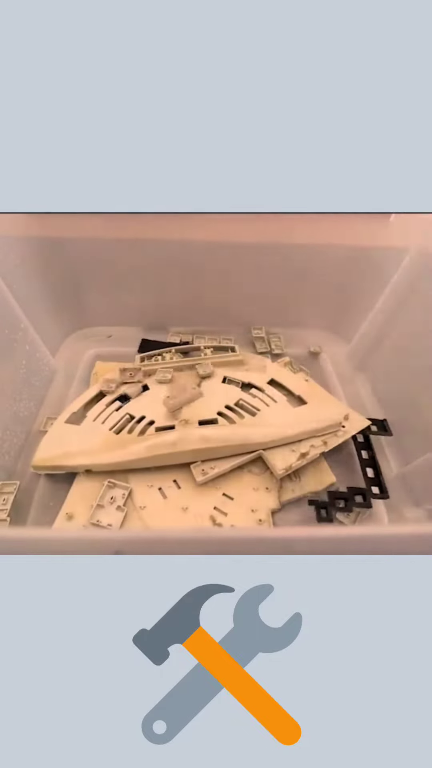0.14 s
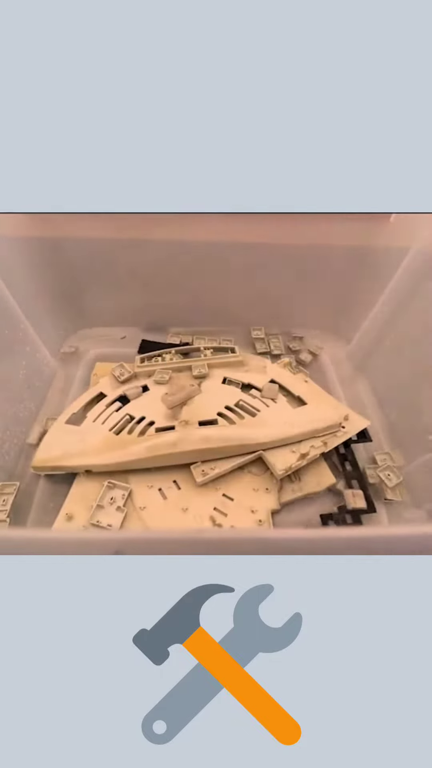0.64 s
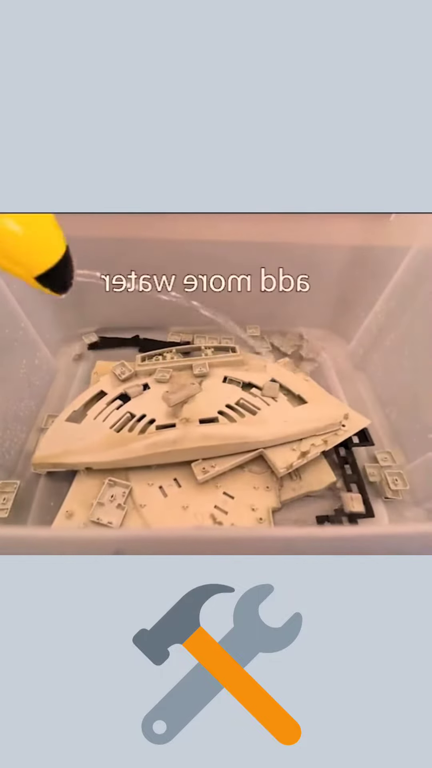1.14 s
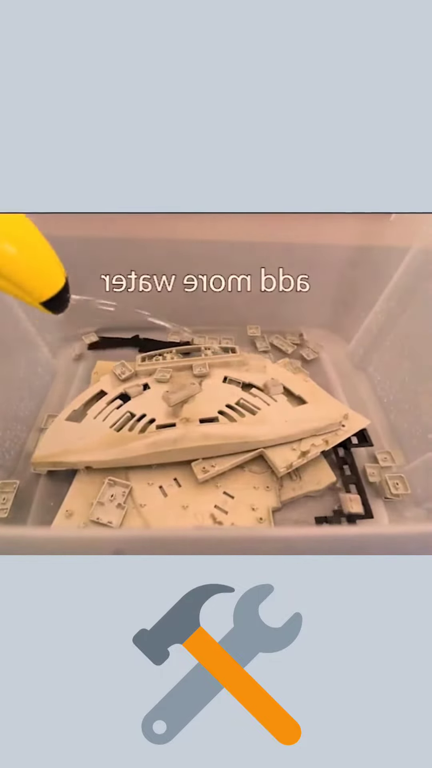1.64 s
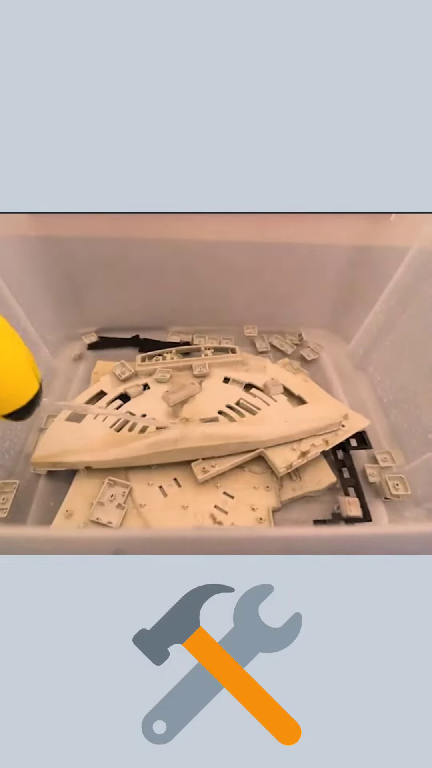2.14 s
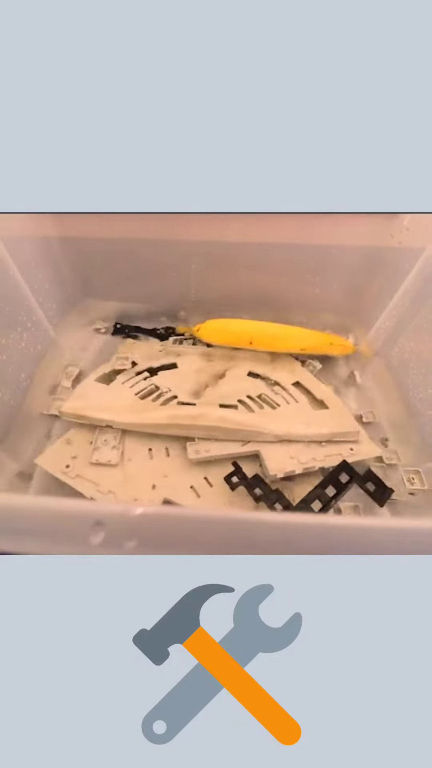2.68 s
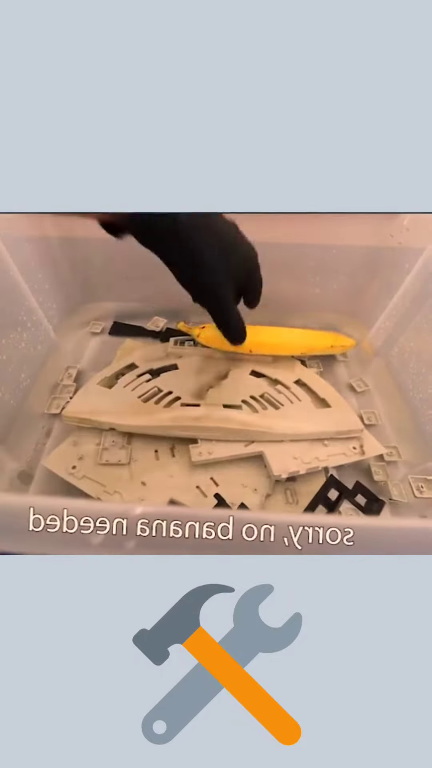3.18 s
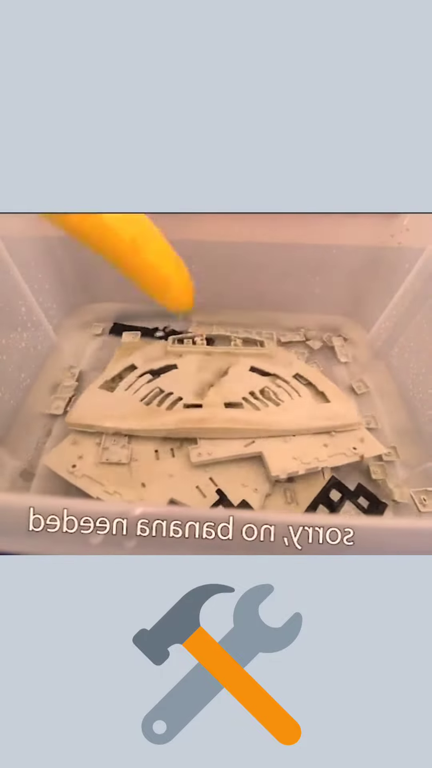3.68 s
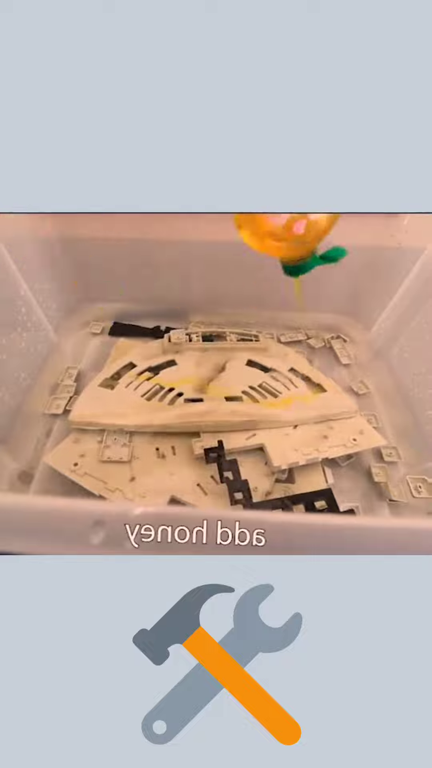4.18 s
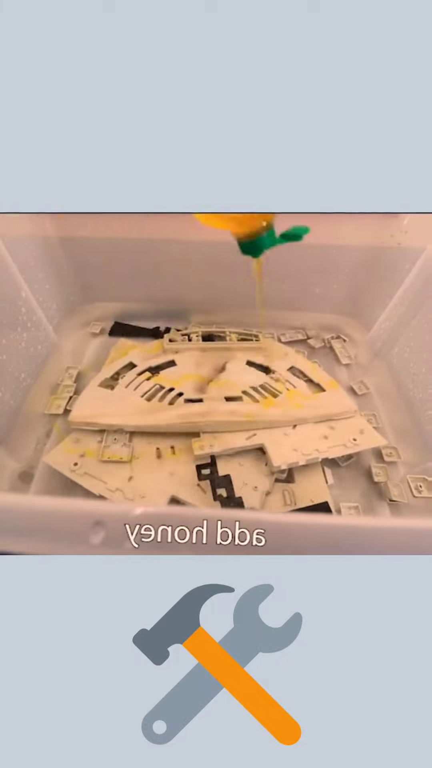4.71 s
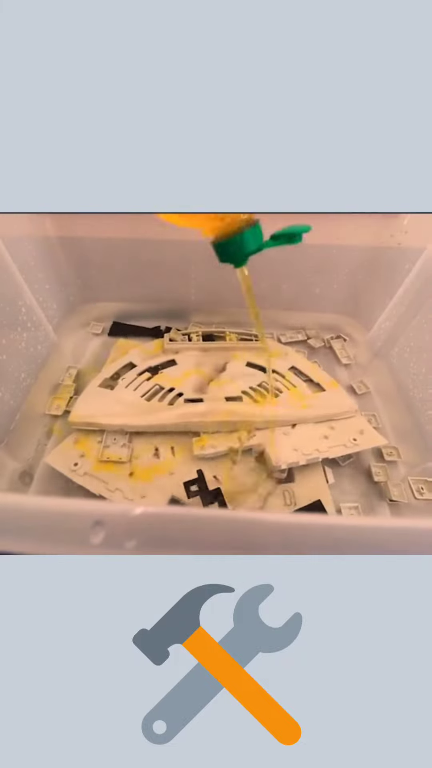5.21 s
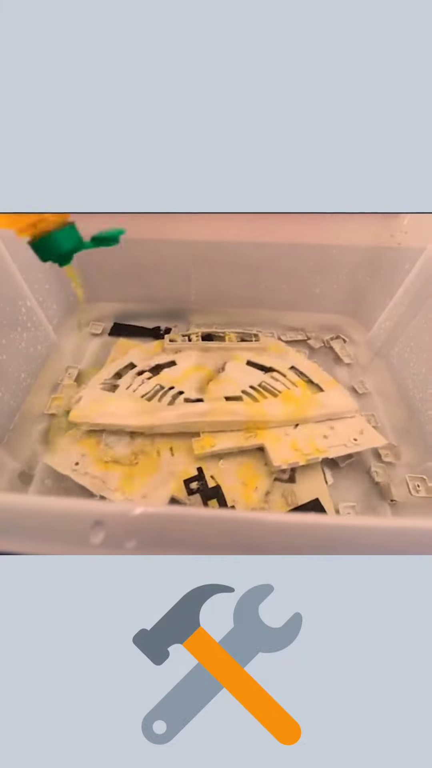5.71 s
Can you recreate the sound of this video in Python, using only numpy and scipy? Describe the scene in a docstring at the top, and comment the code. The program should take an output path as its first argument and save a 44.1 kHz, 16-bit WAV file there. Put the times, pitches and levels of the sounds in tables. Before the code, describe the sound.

Small hard plastic pieces rattle and click in a plastic tub, heard close in stereo in a small quiet room. A busy first second of clatter with hollow knocks and a short creak gives way to sparse taps. Something heavier lands at about two and a half seconds with a loud clatter, settling quickly. Afterwards only faint ticks, a single knock, a brief bottle rasp and thin high fizzing over soft hiss.

```python
"""Keycaps stirred in a plastic tub

Loose plastic keycaps and parts are dropped, stirred and knocked about in a plastic tub on a workbench.
Single caps click (shaped noise through resonances); heavier parts thump the tub (damped modes).
Crowds of tiny contacts rattle and hiss (noise broken into hits); a part creaks, a bottle rasps (noise puffs).
Close stereo in a quiet small room with hiss and a faint hum; the loudest peaks round off."""
import sys
import numpy as np
from scipy import signal
from scipy.fft import rfft, irfft, next_fast_len
from scipy.io import wavfile
from scipy.ndimage import uniform_filter1d

SR = 44100
rng = np.random.default_rng(int(sys.argv[2]) if len(sys.argv) > 2 else 0)


def invert_db(x):
    """Field ratio 10**(x/20) for x, a level in decibels (scalar or array-like)."""
    u = np.asarray(x, float) / 20
    return 10 ** u


def output_pcm(signal):
    """Save a mono or channel-first signal as 16-bit PCM at the path in sys.argv[1].

    Samples are clipped to [-1, 1] before scaling.
    """
    pcm = np.clip(np.atleast_2d(signal).T, -1, 1) * 32767
    wavfile.write(sys.argv[1], SR, np.round(pcm).astype(np.int16))


N = 257544


def unit(x):
    """Scaled to rms 1."""
    return x / np.sqrt(np.mean(x ** 2) + 1e-20)


def along(points, hz):
    """Interpolates (frequency, value) points on a log frequency axis."""
    point_hz, value = np.transpose(points)
    return np.interp(np.log(hz + 1), np.log(point_hz + 1), value)


def filtered(x, response):
    """x times a complex response of frequency."""
    m = next_fast_len(N + SR // 2)
    return irfft(rfft(x, m) * response(np.fft.rfftfreq(m, 1 / SR)), m)[..., :N]


def colour(spectrum):
    """Gain curve through (frequency [Hz], level [dB]) points."""
    return lambda hz: invert_db(along(spectrum, hz))


def peak(hz, centre_hz, width_hz):
    """Response of a causal resonance, 1 at its centre."""
    return 1j * hz * width_hz / (centre_hz ** 2 - hz ** 2 + 1j * hz * width_hz)


# cavities of the caps: (centre [Hz], width [Hz], level [dB])
CAP_CAVITIES = [(1600, 320, -3), (2840, 78, -4.5), (3650, 340, -9.5), (5704, 400, -11.5)]


def hollow(hz):
    """The hollow caps lift a few bands over a flat response."""
    return 0.95 + sum(invert_db(db) * peak(hz, centre_hz, width_hz) for centre_hz, width_hz, db in CAP_CAVITIES)


# stereo likeness of the tub: (frequency [Hz], left-right correlation [1])
TUB_ALIKE = [(50, .4), (130, .975), (700, .98), (1400, .78), (5000, .57), (14000, .3)]


def spread(pair, alike):
    """Two signals mixed as mid and side into left and right of a given likeness."""
    def mix(hz):
        turn = np.arccos(np.clip(along(alike, hz), -1, 1)) / 2
        return np.array([np.cos(turn), 1j * np.sin(turn)])

    mid, side = filtered(pair, mix)
    return np.array([mid + side, mid - side])


def ring(modes, t, scatter_db):
    """Damped modes at new strengths, slightly detuned."""
    out = np.zeros(len(t))
    for hz, db, t60_s in modes:
        strength, detune = rng.standard_normal(2)
        decay = invert_db(db + scatter_db * strength - 60 * t / t60_s)
        out += decay * np.sin(2 * np.pi * hz * (1 + .012 * detune) * t)
    return out


def crowd(per_second, t60_s, size_db):
    """Tiny contacts of scattered size, the big ones with a sharp tick, gate two independent noises."""
    size = invert_db(size_db * np.minimum(rng.exponential(size=N), np.pi))
    hits = (rng.random(N) < per_second / SR) * size
    t = np.arange(SR // 20) / SR
    power = signal.fftconvolve(hits ** 2, invert_db(-120 * t / t60_s))[:N]
    return (np.sqrt(np.abs(power)) + 0.38 * hits ** 2) * rng.standard_normal((2, N))


def patchy(x, depth_db):
    """x with patches of random gain over time and frequency."""
    z = signal.stft(x, nperseg=256)[2]
    field = uniform_filter1d(rng.standard_normal(z.shape[1:]), size=12, axis=0)
    field = uniform_filter1d(field, size=10, axis=1)
    return unit(signal.istft(z * invert_db(depth_db * unit(field)), nperseg=256)[1][:, :N])


# room and microphone hiss: (frequency [Hz], relative density [dB per Hz])
HISS = [(35, -55), (90, -27.5), (176, -6), (202, -11.5), (1090, -21.5), (1620, -20.5), (4640, -25),
        (16000, -32.5)]
# hiss likeness: (frequency [Hz], left-right correlation [1])
HISS_ALIKE = [(130, 1), (640, 0.64), (1400, 0.78), (7000, .05)]
# hum: (frequency [Hz], level [dB rms])
HUM_TONES = [(172, -68.5)]


def air():
    """Steady coloured noise as hiss; noise in a very narrow resonance as a faint wavering hum."""
    hiss_db_rms = -58
    hiss = unit(spread(filtered(rng.standard_normal((2, N)), colour(HISS)), HISS_ALIKE))
    out = invert_db(hiss_db_rms) * hiss
    for hz, db in HUM_TONES:
        out += invert_db(db) * unit(filtered(rng.standard_normal(N), lambda f: peak(f, hz, 2.5)))
    return out


# sliding, spilling, settling parts:
# (start [s], length [s], rattle level [dB], fizz re rattle [dB], tub wall re rattle [dB])
SWARM_EVENTS = [(0.001, 0.018, -40.5, -1, 3), (0.037, 0.036, -39, 5.5, -13), (0.074, 0.18, -15.5, 0.5, -21),
                (0.293, 0.011, -37.5, 7, -28), (0.342, 0.18, -27, -2.5, -11),
                (0.558, 0.053, -36.5, -3, 0.5), (0.636, 0.084, -26.5, -3, -17),
                (0.749, 0.06, -26, -13, -3.5), (0.867, 0.075, -35.5, -4.5, -28),
                (0.97, 0.023, -28.5, 6.5, -15), (0.997, 0.072, -24, -4.5, -7),
                (1.076, 0.05, -20.5, -4, -11), (1.125, 0.046, -36.5, 7, -7.5), (1.179, 0.11, -39, -2.5, -8),
                (1.304, 0.06, -38.5, 0.5, -16.5), (1.359, 0.28, -45.0, -3.5, -4),
                (1.547, 0.18, -41.5, -5, -12.5), (1.615, 0.051, -28, -0.5, -19),
                (1.682, 0.2, -43.5, 3.5, -3), (1.888, 0.038, -39.5, -6, -4.5),
                (1.922, 0.062, -25.5, -6, -17), (1.991, 0.059, -38.5, -1, -8),
                (2.053, 0.24, -46.5, -4, -7.5), (2.361, 0.033, -34, -6.5, -14.5),
                (2.437, 0.0089, -37, -12, 12.5), (2.453, 0.03, -12.5, -9, -2),
                (2.488, 0.09, -22.5, -10, -2.5), (2.582, 0.14, -34, -12, 1.5), (2.734, 0.13, -45, -15.5, 6),
                (2.87, 0.22, -53, -22, 3), (3.211, 0.14, -53.5, -5, -9.5), (3.363, 0.31, -48, -4.5, 8.5),
                (3.688, 0.082, -50, -10.5, 1), (3.788, 0.044, -58, -23.5, 17.5),
                (3.851, 0.023, -51, -17, 11.5), (3.969, 0.049, -41, -16, -2), (4.479, 0.088, -68.5, 19, 1),
                (4.835, 0.021, -56, 21.5, -11), (4.987, 0.055, -70.5, 16, 3.5),
                (5.058, 0.09, -70.5, 21.5, 4.5), (5.263, 0.052, -57.5, 18.5, 4),
                (5.386, 0.038, -66.5, 18.5, 5), (5.469, 0.096, -59, 10.5, -1), (5.564, 0.33, -59.5, 0, 5)]
# start-to-end loss of a swarm set off by a click: (rattle [dB], fizz [dB], wall [dB])
SWARM_SAG = [8.5, 8.5, 19.5]
# steady faint noise floor under the swarms: (rattle [dB], fizz [dB], wall [dB])
NOISE_FLOOR = [-68, -68, -67]


def swarms():
    """Levels [dB] of rattle, fizz, wall: swarms rise and fade, click-set ones sag; powers add."""
    swell_db_per_s, burst_db_per_s, fade_db_per_s = 2006.5, 5000.5, 1148
    set_off_s = .006  # a click this close to the start sets the swarm off; otherwise a push swells
    t = np.arange(N) / SR
    power = invert_db(np.c_[NOISE_FLOOR]) ** 2 * np.ones(N)
    for start_s, length_s, db, fizz_db, wall_db in SWARM_EVENTS:
        set_off = min(abs(start_s - click[0]) for click in CLICK_EVENTS) < set_off_s
        rise_db = (burst_db_per_s if set_off else swell_db_per_s) * np.maximum(start_s - t, 0)
        edge_db = db - rise_db - fade_db_per_s * np.maximum(t - start_s - length_s, 0)
        near = edge_db > -100
        through = np.clip((t[near] - start_s) / length_s, 0, 1) - .5
        sag_db = set_off * np.outer(SWARM_SAG, through)
        power[:, near] += invert_db(edge_db[near] + np.c_[[0, fizz_db, wall_db]] - sag_db) ** 2
    return 10 * np.log10(power)


# rattle colour: (frequency [Hz], relative density [dB per Hz])
RATTLE_COLOUR = [(800, -28), (1300, -6.5), (3400, -0.5), (6500, -6.5), (7500, -40)]
# fizz and click-snap colour: (frequency [Hz], relative density [dB per Hz])
FIZZ_COLOUR = [(5000, -30.5), (7400, -3), (9000, -4), (15500, -8), (16400, -31.5)]


def stir():
    """Swarms of small contacts: a rattle in the caps, a fizz above it, a mutter in the wall, a low rumble."""
    rattle_db, fizz_db, wall_db = swarms()
    rattle = filtered(crowd(450, 0.047, size_db=3.5), lambda f: colour(RATTLE_COLOUR)(f) * hollow(f))
    fizz = filtered(crowd(1100, 0.08, size_db=3.0), colour(FIZZ_COLOUR))

    def share(above_db):
        return 1 / (1 + np.exp(-(fizz_db - rattle_db - above_db) / 1.0))

    def blend(x, small):
        thin = unit(filtered(x[::-1], lambda f: (f / 4000) ** 2))
        return patchy(np.sqrt(1 - small) * unit(x) + np.sqrt(small) * thin, depth_db=3.0)

    # much fizz means small, high-pitched pieces
    rattle = blend(rattle, share(above_db=-3.5))
    fizz = blend(fizz, share(above_db=7.0))

    def wall(f):
        out = 0.6 * peak(f, 720, 400) ** 2
        for hz, db, t60_s in WALL_MODES + FLOOR_MODES:
            out = out + invert_db(db + 2.3 * (hz < 200)) * peak(f, hz, 3.8 / t60_s)
        return out

    knocks = crowd(300, 0.029, size_db=3.0)
    # level set before the filter: the tub rings on after a swarm
    mutter = filtered(invert_db(wall_db) * knocks, wall) / np.std(filtered(knocks, wall))
    low_noise = unit(filtered(rng.standard_normal((2, N)), lambda f: peak(f, 34, 65)))
    rumble = invert_db(fizz_db - 33) * low_noise  # faint low rumble that follows the fizz
    return spread(invert_db(rattle_db) * rattle + invert_db(fizz_db) * fizz + mutter + rumble, TUB_ALIKE)


# single contacts, touch 1 ms after the listed time:
# (time [s], body level [dB], snap level [dB], body pitch [Hz], t60 [s])
CLICK_EVENTS = [(0.0722, -5, -14, 5030, 0.019), (0.092, -5, -22, 6300, .04),
                (0.148, -5, -20.5, 6400, 0.057), (0.172, -6, -22, 6400, 0.048),
                (0.3407, -2, -13, 2740, 0.066), (0.3661, 2, -12, 6460, 0.013),
                (0.387, -0.5, -10.5, 5960, 0.035), (0.4165, -7.5, -9, 6200, 0.037),
                (0.4543, -7, -27.5, 5470, 0.059), (0.541, -8, -15.5, 3300, 0.039),
                (0.5451, -2.5, -16, 3440, 0.029), (0.5538, 6.5, -13.5, 2850, 0.065),
                (0.6398, 1, -13, 6340, 0.074), (0.6571, -5, -8.5, 3650, 0.02),
                (0.6926, -5.5, -14, 2320, 0.069), (0.7266, -15, -23, 2200, 0.0064),
                (0.751, 6.5, -18, 1600, 0.031), (0.978, -15.5, -18, 4200, 0.033),
                (0.9865, -9, -24, 2620, 0.075), (1.5394, -30, -28, 3980, 0.031),
                (1.724, -22, -19.5, 2140, 0.02), (1.775, -22, -31, 2080, 0.029),
                (1.7913, -15.5, -41.5, 2070, 0.046), (1.9216, -1, -21, 5700, 0.04),
                (1.932, 4, -14.5, 5720, 0.033), (1.977, -6, -19, 5300, 0.03),
                (2.182, -14.5, -48.5, 1598, 0.04), (2.4335, -0.5, -27.5, 900, 0.008),
                (2.4745, -1, -30.5, 1560, 0.015), (2.5115, -0.5, -28, 6300, 0.053),
                (2.626, -15, -50.5, 3000, 0.027), (2.6454, -8.5, -56.5, 4080, 0.021),
                (2.7038, -9, -54.5, 3080, 0.029), (2.777, -16.5, -51, 3000, 0.033),
                (2.8013, -14, -67, 3690, 0.035), (2.829, -17, -61, 3930, 0.019),
                (2.9201, -20, -64, 2840, 0.047), (3.0362, -13, -67.5, 3110, 0.019),
                (3.066, -21, -70.5, 3300, 0.028), (3.582, -27, -38, 2500, 0.027),
                (3.9723, -7.5, -58, 2480, 0.035), (4.882, -55, -37.5, 7500, 0.016),
                (4.9933, -60.5, -35.5, 7540, .028), (5.0882, -25.5, -40, 6080, 0.022),
                (5.2035, -41.5, -26.5, 6250, 0.052), (5.2568, -23.5, -33, 5370, 0.019),
                (5.3623, -23, -20, 5660, 0.024), (5.466, -14.5, -31.5, 2350, 0.025),
                (5.519, -21.5, -47.5, 6250, 0.027), (5.5592, -15.5, -24, 2880, 0.012),
                (5.644, -13, -21.5, 2570, 0.018), (5.679, -28.5, -55.5, 1490, 0.022),
                (5.7128, -27, -55.5, 3380, 0.039), (5.7427, -25, -33, 1480, 0.04),
                (5.8101, -29, -32, 2640, 0.016)]


def clicks():
    """Each contact is a hard touch and a crumbly tail: a pitched body and a bright snap."""
    body, snap = np.zeros((2, 2, N + SR))
    t = np.arange(SR // 8) / SR - .004
    hz = np.fft.rfftfreq(len(t), 1 / SR)
    onset = 1 / (1 + np.exp(-t / .0003))
    touch = 4.6 * (np.abs(t) < .5 / SR)  # one sharp push
    for time_s, body_db, snap_db, pitch_hz, t60_s in CLICK_EVENTS:
        noise = rng.standard_normal((2, 2, len(t)))
        steps = np.repeat(rng.standard_normal(len(t) // 64 + 1), 64)[:len(t)]
        chatter = invert_db(3.1 * steps)  # quick rebounds
        tail = invert_db(-60 * t / t60_s) + 0.085 * invert_db(-20 * t / t60_s)
        fade = chatter * onset * (tail + 0.45 * invert_db(-60 * np.abs(t) / 0.0045))
        shell = 0.38 * peak(hz, np.sqrt(3500 * pitch_hz), 4400) ** 2
        shell = shell + peak(hz, pitch_hz, .17 * pitch_hz) ** 2
        tone = irfft(rfft(noise[0] * fade + touch) * shell, len(t))
        high = np.clip((snap_db - body_db + 15.0) / 9, 0, 4)  # a contact that is all snap sits higher
        hiss = irfft(rfft(noise[1] * fade) * (hz / 11000) ** high, len(t))
        start = round((time_s - .003) * SR)
        body[:, start:][:, :len(t)] += invert_db(body_db) * tone / np.abs(tone).max(axis=1, keepdims=True)
        snap[:, start:][:, :len(t)] += invert_db(snap_db + 8.5) * hiss
    body = filtered(body[:, :N], lambda f: np.sqrt(hollow(f)) / (1 + 1j * f / 7500) ** 2)
    snap = filtered(snap[:, :N], colour(FIZZ_COLOUR))
    return spread(body + snap, TUB_ALIKE)


# blows on the tub: (time [s], wall level [dB], floor boom re wall [dB], pitch [Hz])
THUMP_EVENTS = [(0.342, -13.5, -38, 680), (0.528, -29.5, -17, 303), (0.554, -5, -34, 900),
                (0.693, -15, -22, 887), (0.752, -3.5, -34.5, 764), (0.99, -23, -14, 740),
                (1.003, -34, 4.5, 176), (1.721, -12.5, -10.5, 680), (1.774, -16.5, -15, 647),
                (1.793, -23.5, -4.5, 870), (1.956, -8.5, -23, 790), (2.173, -23.5, -8.5, 614),
                (2.183, -12, -9, 637), (2.433, -12.5, -16, 490), (2.446, -12, -21.5, 790),
                (2.463, -6.5, -19.5, 843), (2.474, -12, -26.5, 876), (2.68, -31, -32, 694),
                (3.698, -34.5, -4.5, 706), (3.708, -19, -6, 855), (3.8, -37.5, -13, 705),
                (3.972, -21.5, -45.5, 810), (4.268, -51.5, -8, 660), (5.17, -26, -31.5, 525),
                (5.559, -40.5, -31.5, 756), (5.635, -24.5, -16.5, 500), (5.685, -32, -23, 248),
                (5.7, -25.5, -22.5, 430)]
# tub wall: (frequency [Hz], level [dB], t60 [s])
WALL_MODES = [(378, 0, 0.018), (603, 0.5, 0.041), (727, 4.5, 0.024), (810, -5.5, 0.056), (1180, -8.5, .016),
              (1600, -8, 0.06)]
# tub floor on the bench: (frequency [Hz], level [dB], t60 [s])
FLOOR_MODES = [(153.6, -10, 0.24), (176, -1, 0.17), (247.5, -1.5, 0.081)]


def thumps():
    """A heavier part rings the tub wall, mostly the modes near its own pitch, and booms through the floor."""
    out = np.zeros((2, N + SR))
    t = np.arange(SR // 3) / SR
    soft = 1 - np.exp(-t / 0.00097)
    for time_s, wall_db, boom_db, pitch_hz in THUMP_EVENTS:
        struck = [(hz, db - 12 * abs(np.log2(hz / pitch_hz)), t60_s) for hz, db, t60_s in WALL_MODES]
        struck += [(pitch_hz, 7, .026), (1.45 * pitch_hz, -1.5, .012)]
        for ear in out:
            blow = ring(struck, t, scatter_db=3.0)
            blow = blow + invert_db(boom_db + 10.5) * ring(FLOOR_MODES, t, scatter_db=3.0)
            ear[round(time_s * SR):][:len(t)] += invert_db(wall_db - 3.0) * soft * blow
    # the tub is too small for deep bass
    return spread(filtered(out[:, :N], lambda f: (1j * f / (90 + 1j * f)) ** 4), TUB_ALIKE)


# short slips of a creaking part: (time [s], level [dB], pitch [Hz])
SLIPS = [(0.851, -44, 1210), (0.883, -27.5, 1380), (0.907, -31, 1300), (0.918, -29.5, 1830),
         (0.9334, -29.5, 1450), (0.9655, -30, 1787)]


def squeak():
    """Each slip is a short scrape through one loose resonance."""
    out = np.zeros(N + SR)
    t = np.arange(SR // 20) / SR
    f = np.fft.rfftfreq(len(t), 1 / SR)
    envelope = (1 - np.exp(-t / 0.0016)) * invert_db(-60 * t / .035)
    for time_s, db, hz in SLIPS:
        scrape = irfft(rfft(rng.standard_normal(len(t))) * peak(f, hz, 240) ** 2, len(t))
        out[round(time_s * SR):][:len(t)] += invert_db(db + 4.0) * unit(scrape) * envelope
    return out[:N]


# squeezed bottle: (centre [Hz], width [Hz], level [dB])
BOTTLE_BANDS = [(900, 480, -2), (1260, 180, -2.5), (2200, 670, -5.5), (3900, 1400, -9.5)]
# its wall buckles in jerks: (time [s], level [dB])
JERKS = [(4.553, -30.5), (4.572, -39.5), (4.596, -33), (4.624, -35), (4.68, -43), (4.7, -37.5)]


def bottle():
    """Each jerk is a dying puff of noise in the bottle's bands."""
    out = np.zeros((2, N + SR))
    t = np.arange(SR // 10) / SR
    for time_s, db in JERKS:
        puff = invert_db(db + 8.5 - 60 * t / 0.11) * rng.standard_normal((2, len(t)))
        out[:, round(time_s * SR):][:, :len(t)] += puff

    def bands(f):
        return sum(invert_db(db) * peak(f, centre_hz, width_hz) ** 2 for centre_hz, width_hz, db in BOTTLE_BANDS)

    return spread(filtered(out[:, :N], bands), TUB_ALIKE)


# room decay: (frequency [Hz], t60 [s])
ROOM_DECAY = [(200, 0.15), (12000, 0.048)]


def room(x):
    """Each frequency of the room's answer, decaying noise, dies at its own speed."""
    hz, t, z = signal.stft(rng.standard_normal((2, SR // 3)), SR, nperseg=256)
    tail = signal.istft(z * invert_db(-60 * t / along(ROOM_DECAY, hz)[:, None]), SR, nperseg=256)[1]
    late = np.pad(x, ((0, 0), (200, 0)))  # delay in samples
    return signal.fftconvolve(late, tail / np.linalg.norm(tail[0]), axes=1)[:, :N]


def scene():
    """The tub, its room and the air."""
    tub = clicks() + thumps() + stir() + squeak() + bottle()
    return tub + invert_db(-11.0) * spread(room(tub), TUB_ALIKE) + air()


def low_pass(x):
    """Removes everything above the highest recorded frequency."""
    return signal.sosfilt(signal.butter(12, 16050, fs=SR, output="sos"), x)


def record(dry):
    """The loudest peaks round off at full scale."""
    clipped = dry / (1 + dry ** 8) ** (1 / 8)
    return low_pass(clipped)


dry = scene()
out = record(dry)
output_pcm(out)
```